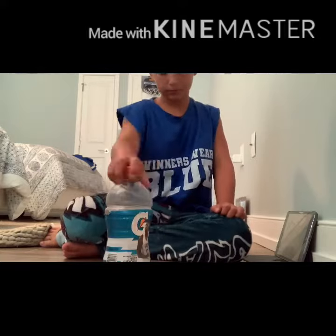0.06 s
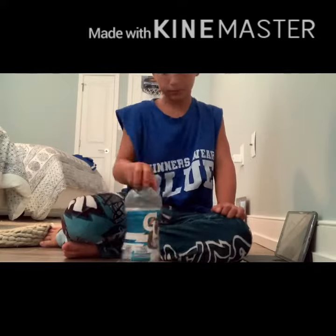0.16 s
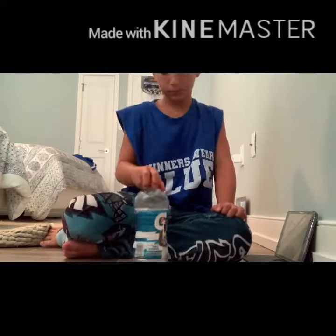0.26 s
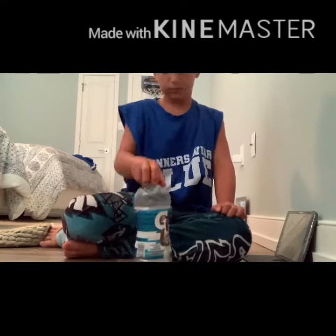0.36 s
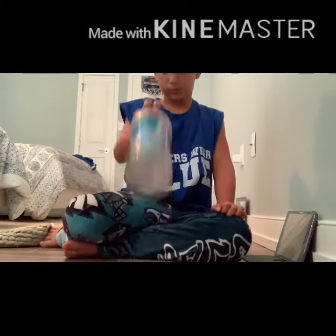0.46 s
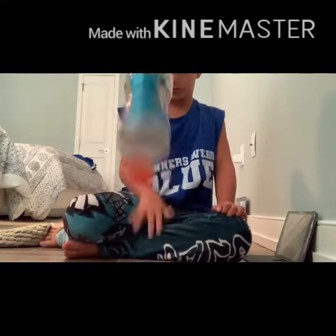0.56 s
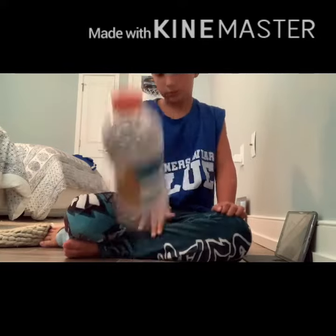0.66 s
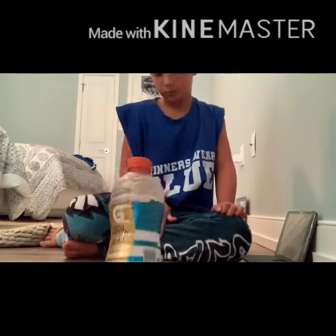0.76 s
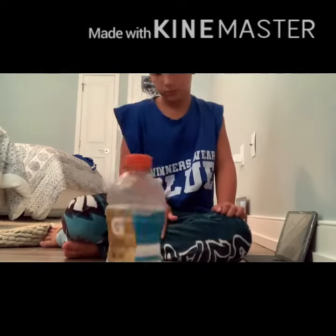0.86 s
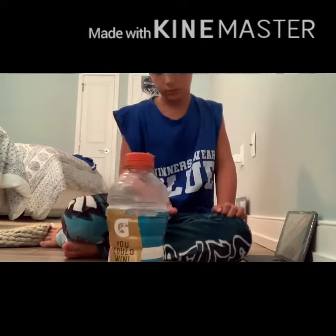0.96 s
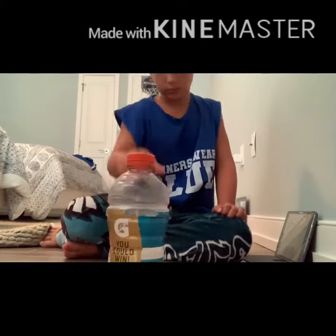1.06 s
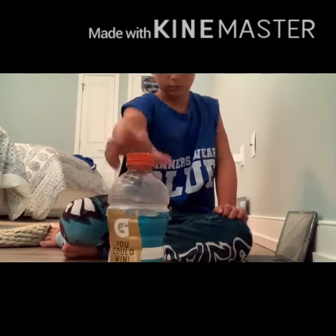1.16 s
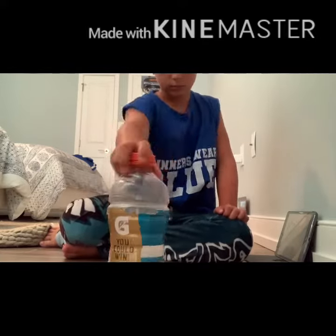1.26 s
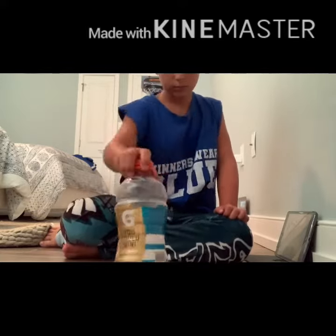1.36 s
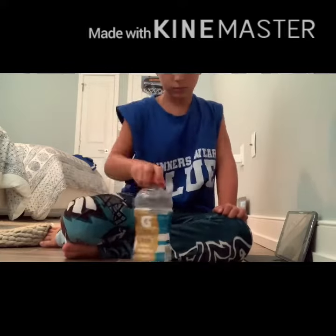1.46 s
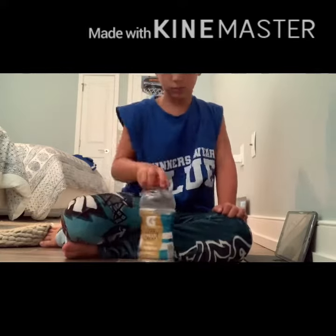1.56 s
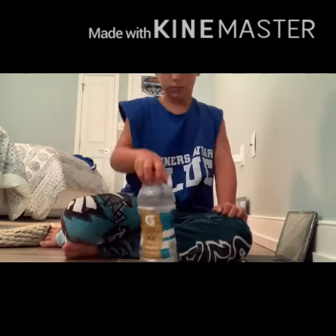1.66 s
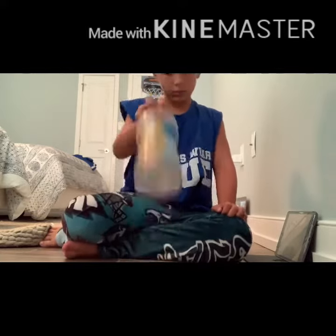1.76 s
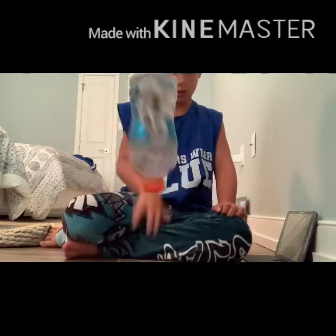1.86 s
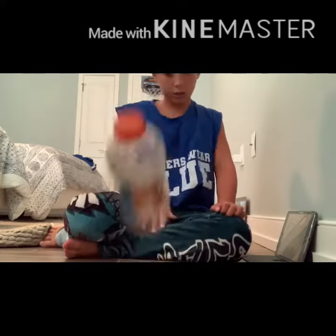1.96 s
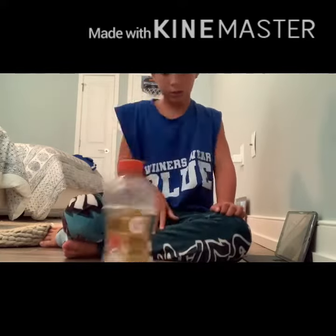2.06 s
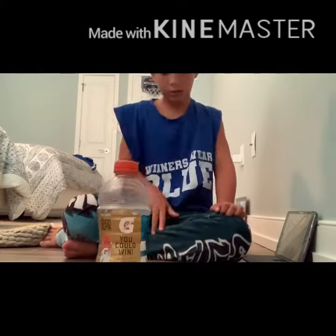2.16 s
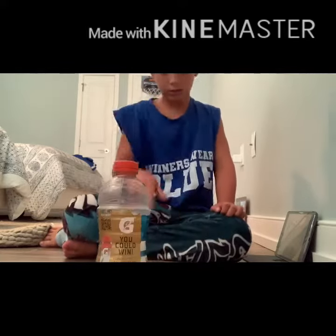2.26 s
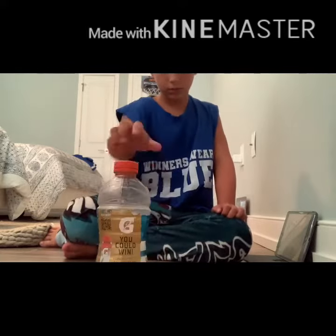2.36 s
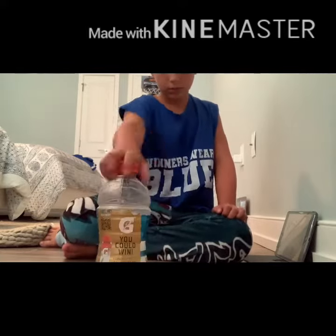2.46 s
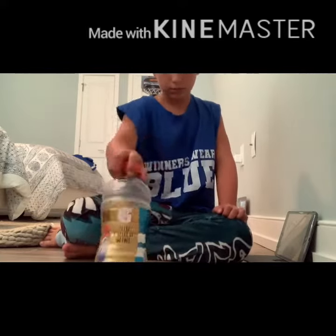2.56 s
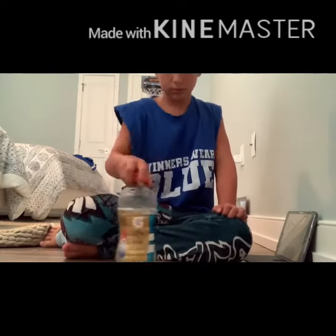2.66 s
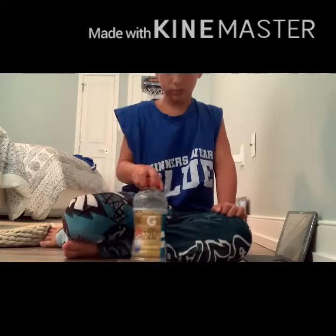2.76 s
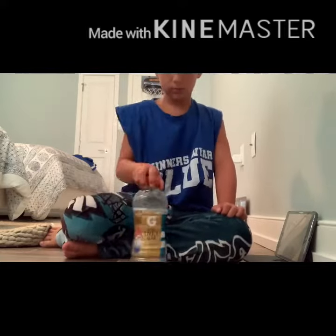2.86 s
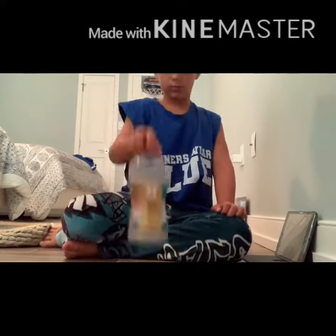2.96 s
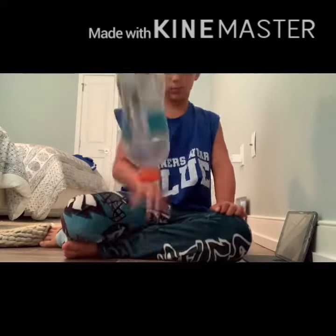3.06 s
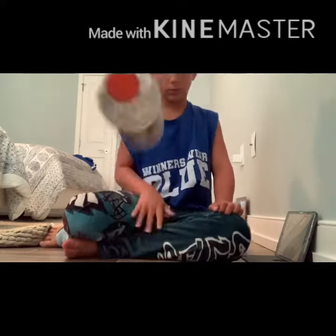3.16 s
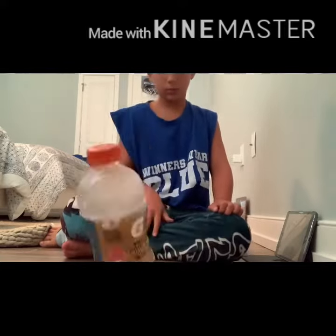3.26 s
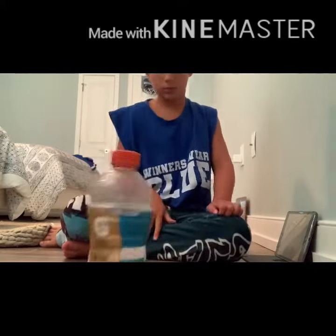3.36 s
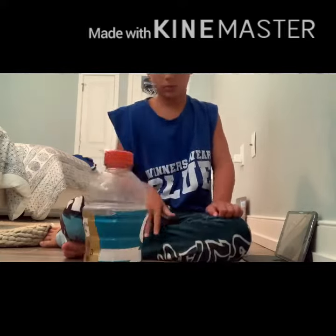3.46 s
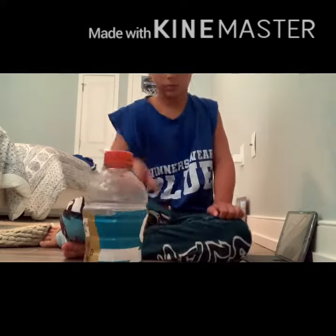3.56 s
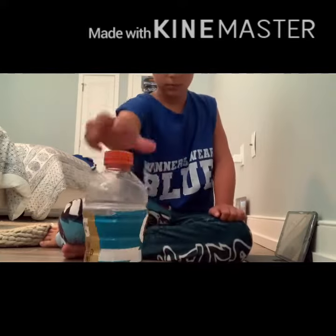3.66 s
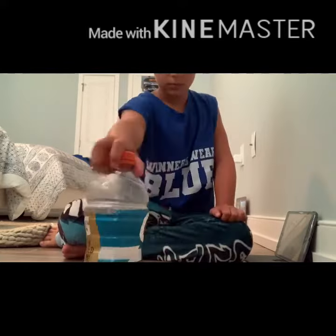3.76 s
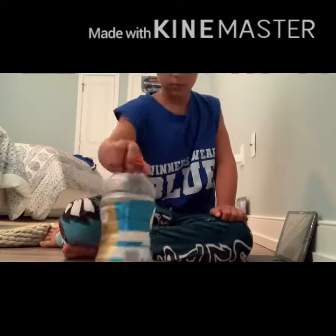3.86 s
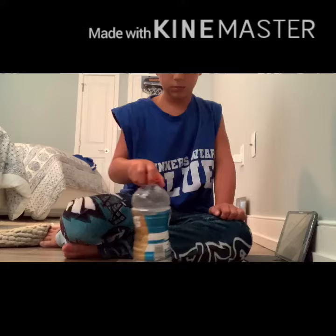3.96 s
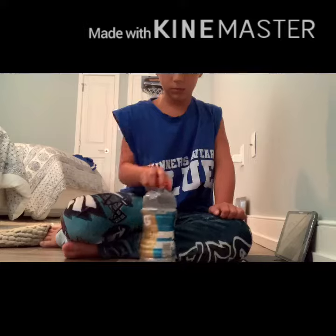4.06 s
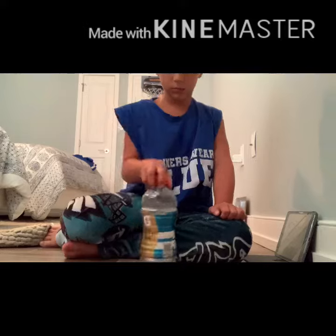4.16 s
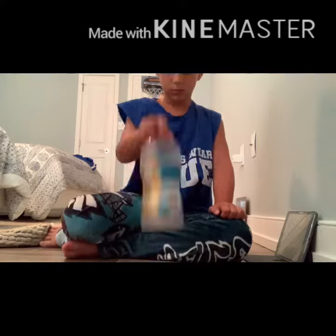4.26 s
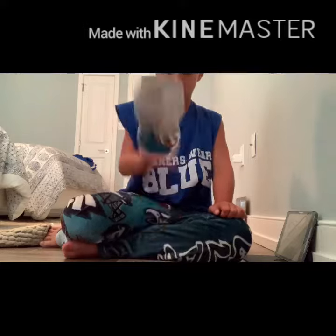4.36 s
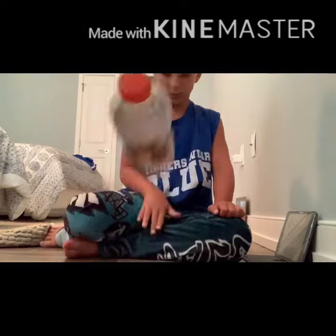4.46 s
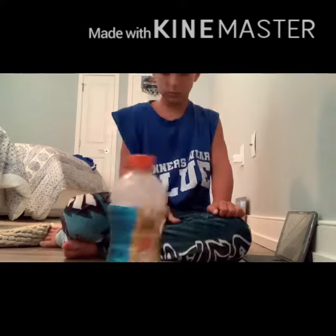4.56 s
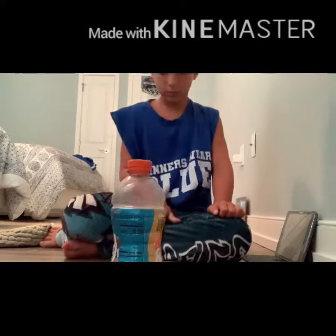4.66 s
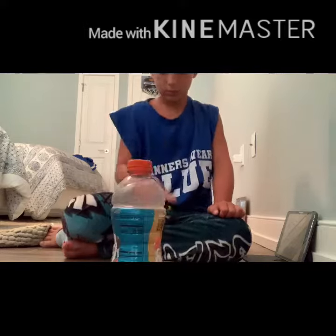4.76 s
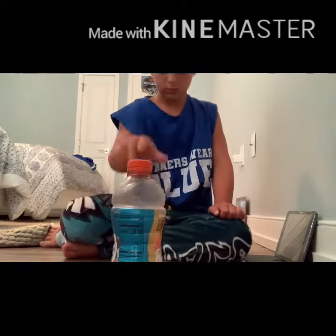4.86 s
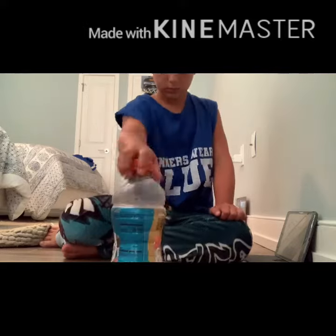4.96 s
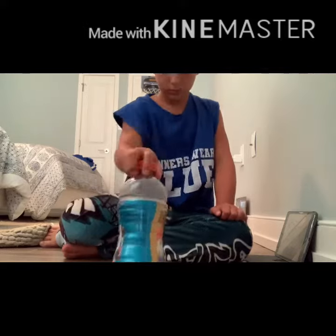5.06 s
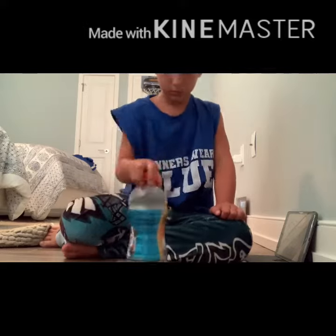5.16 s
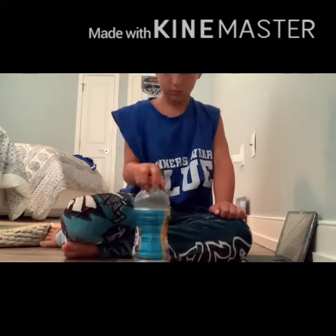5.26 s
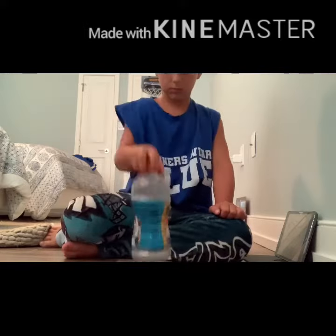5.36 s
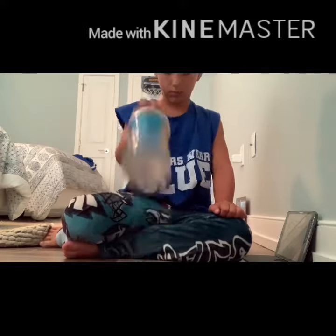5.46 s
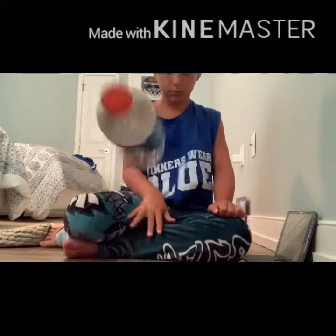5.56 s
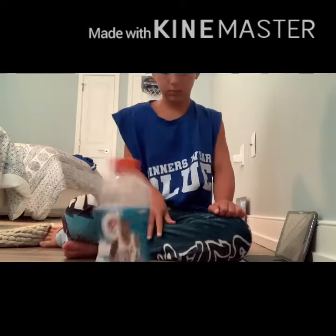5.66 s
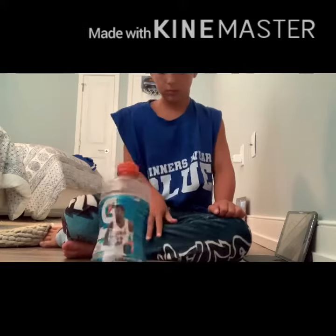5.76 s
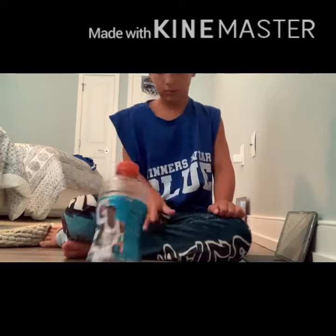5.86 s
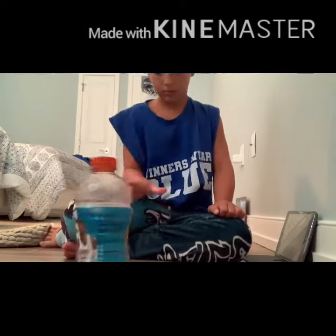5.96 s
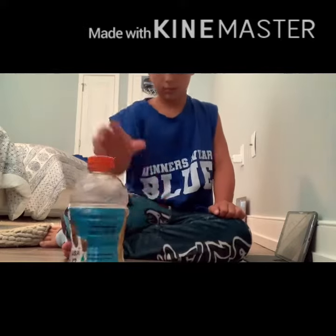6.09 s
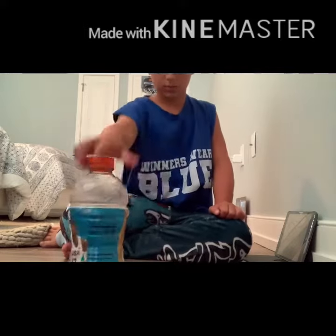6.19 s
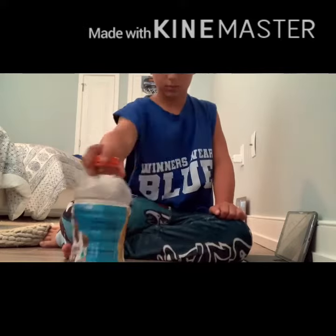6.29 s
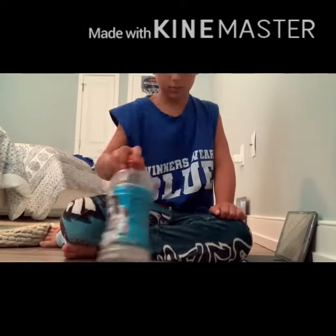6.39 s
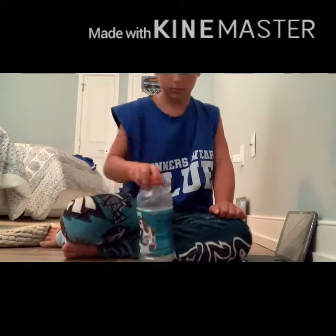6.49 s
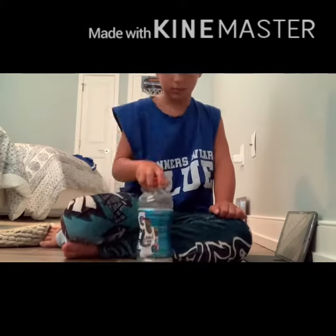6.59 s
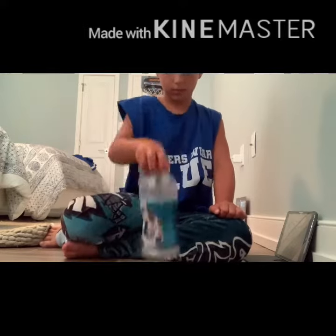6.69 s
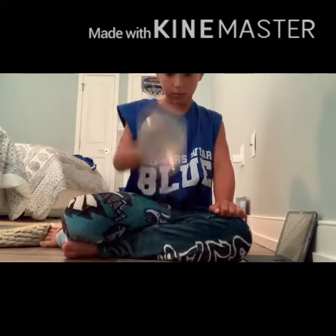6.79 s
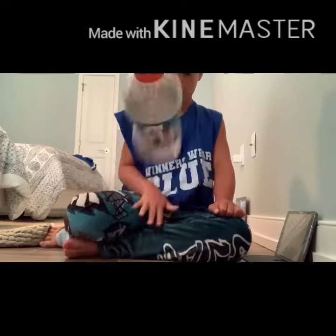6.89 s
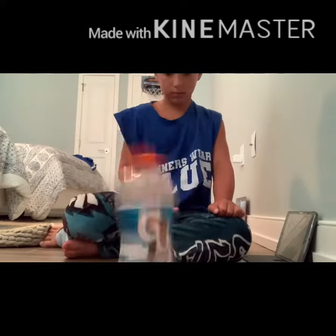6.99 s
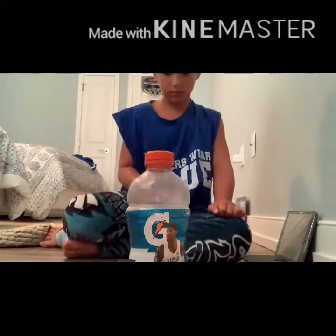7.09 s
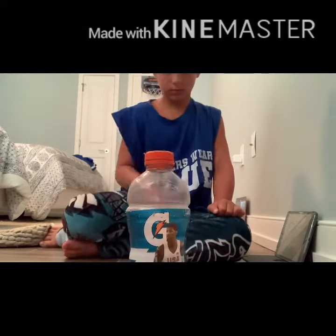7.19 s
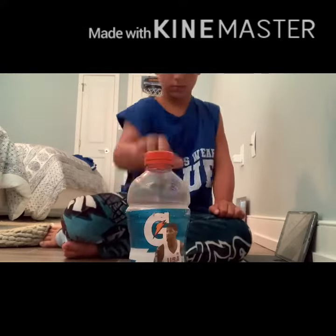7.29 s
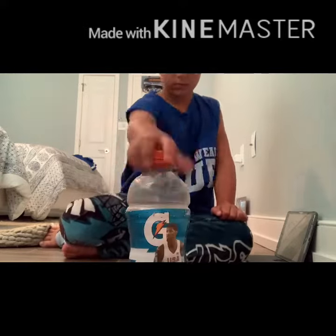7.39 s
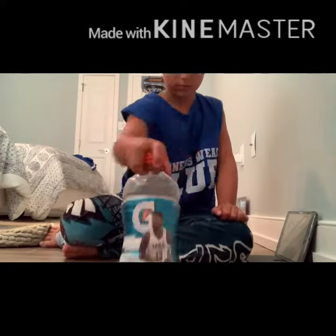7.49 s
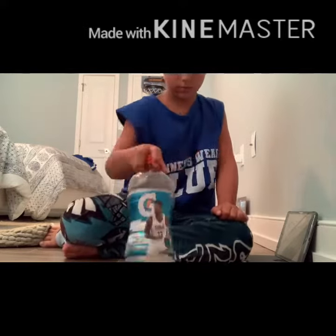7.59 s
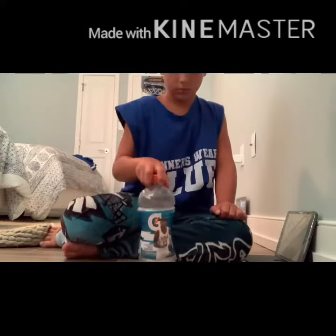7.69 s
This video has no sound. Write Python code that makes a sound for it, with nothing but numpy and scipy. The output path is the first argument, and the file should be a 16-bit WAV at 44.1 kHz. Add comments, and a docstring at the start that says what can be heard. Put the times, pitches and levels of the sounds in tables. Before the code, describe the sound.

Close recording in a small room with a faint low ventilation rush. A half-empty plastic bottle scrapes briefly over a hard floor, is flicked up with a hissing spray of water, and lands with a sharp hollow crack and thud, then rocks and gurgles. Light finger knocks follow. The cycle repeats six times, about every 1.3 seconds; the later throws lack the scrape.

```python
"""Over a steady low rush of ventilation, a partly filled plastic bottle is flipped six times onto a hard
floor in a small room, with drags over the floor before the first three throws. In swing and flight it hums
on gliding modes and the water sprays; landings are a noise crack, ringing modes and a falling floor sweep.
Coloured grains make the slosh and fizz as it rocks, and the hand's light knocks fall between throws.
Reflections and a diffuse tail form the room, heard close up through two microphone ports."""
import sys
import numpy as np
from scipy import signal
from scipy.fft import rfft, irfft, next_fast_len
from scipy.io import wavfile
from scipy.ndimage import uniform_filter1d, map_coordinates

SR = 44100
rng = np.random.default_rng(int(sys.argv[2]) if len(sys.argv) > 2 else 0)


def inscribe(sig):
    """Save sig as 16-bit PCM at rate SR to the path in sys.argv[1].

    A 1-D sig is mono; a 2-D sig holds one channel per row.
    Samples are clipped to [-1, 1] before scaling.
    """
    pcm = np.round(np.clip(np.atleast_2d(sig).T, -1, 1) * 32767)
    wavfile.write(sys.argv[1], SR, pcm.astype(np.int16))


N = 340893  # length of the scene in samples


def amp(db):
    """Decibels to gain."""
    return 10 ** (np.asarray(db) / 20)


def unit(x):
    """Scales to an rms of one."""
    return x / np.sqrt(np.mean(x ** 2) + 1e-20)


def read(points, hz):
    """Reads a table along a log-frequency axis."""
    f, value = np.transpose(points)
    return np.interp(np.log(hz + 1), np.log(f + 1), value)


def add(track, s, sound):
    """Mixes a sound in at time s."""
    part = track[max(round(s * SR), 0):][:len(sound)]
    part += sound[:len(part)]


def envelope(rows, attack_s, sag_db_per_s, release_db_per_s):
    """Gain over the whole scene for rows of (start s, length s, dB): attack, sagging hold, release."""
    t, gain = np.arange(SR // 2) / SR, np.zeros(N)
    for s, length, db in rows:
        fall = sag_db_per_s * t + release_db_per_s * np.maximum(t - length, 0)
        add(gain, s, np.minimum(t / attack_s, 1) * amp(db - fall))
    return gain


def colour(x, spectrum, size=2048):
    """Causal (minimum-phase) filter of unit energy with the given spectrum."""
    log_gain = np.log(amp(read(spectrum, abs(np.fft.fftfreq(size, 1 / SR)))))
    taps = np.fft.ifft(np.exp(np.conj(signal.hilbert(log_gain)))).real
    return signal.oaconvolve(x, taps / np.linalg.norm(taps))[:len(x)]


def grains(spectrum, per_s, spread_db=4):
    """A dense train of tiny impacts of uneven size, coloured, rms one."""
    size = amp(spread_db * np.minimum(rng.exponential(1, N), 3)) * rng.choice([-1, 1], N)
    struck = rng.random(N) < per_s / SR
    return unit(colour(size * struck, spectrum))


def smooth(x, bins, frames):
    """Moving average over the bins and frames of a spectrogram."""
    return uniform_filter1d(uniform_filter1d(x, size=bins, axis=0), size=frames, axis=1)


def patchy(x, depth_db):
    """Uneven contact: short patches of the spectrum flare and fade on their own."""
    _, _, z = signal.stft(x, SR, nperseg=512, noverlap=384)
    patches = smooth(rng.standard_normal(z.shape), bins=4, frames=6)
    z = z * amp(depth_db * unit(patches))
    return unit(signal.istft(z, SR, nperseg=512, noverlap=384)[1][:N])


# how alike diffuse sound is at the two ports: (f/Hz, likeness from 0 to 1)
PORT_LIKENESS = [(100, 1), (600, 0.98), (1500, 0.08), (2800, 0.24), (8000, 0.1), (15000, .35)]


def diffuse(pair):
    """Makes two unrelated signals alike in the bass, as close ports hear a diffuse field."""
    a, b = rfft(pair)
    same = np.clip(read(PORT_LIKENESS, np.fft.rfftfreq(pair.shape[1], 1 / SR)), -1, 1)
    return irfft([a, same * a + np.sqrt(1 - same ** 2) * b], pair.shape[1])


# spectrum of the ventilation's rush: (f/Hz, relative level/dB)
AIR_SPECTRUM = [(15, -43.5), (25, -33.5), (99, -7), (194, -4), (324, -17.5), (425, -8.5), (486, -21),
                (749, -16), (812, -29.5), (881, -22), (1040, -28.5), (1590, -29), (2150, -38.5),
                (5520, -38), (15800, -47)]
# partials of the motor: (f/Hz, mean level/dB)
MOTOR_HUM = [(111, -59.5), (220, -57), (333, -68.5)]


def background(rush_db=-55.0):
    """Low rush of ventilation with a motor hum wavering in level and phase."""
    noise = diffuse(rng.standard_normal((2, N)))
    rush = unit(np.array([colour(channel, AIR_SPECTRUM, size=8192) for channel in noise]))
    t, knots = np.arange(N) / SR, np.linspace(0, N / SR, 40)

    def waver():
        """A slow random drift."""
        return np.interp(t, knots, rng.standard_normal(len(knots)))

    hum = np.zeros(N)
    for hz, db in MOTOR_HUM:
        hum += amp(db + 1.5 * waver()) * np.sin(2 * np.pi * hz * t + 3.0 * waver())
    return amp(rush_db) * rush + hum


# base dragged over the floor: (start t/s, fastest t/s, end t/s, rumble level/dB, hiss level/dB before trim)
DRAGS = [(0.017, 0.093, 0.27, -40.5, -41.5), (1.216, 1.303, 1.59, -39, -39),
         (2.472, 2.54, 2.737, -38.5, -38.5)]
# spectrum of the coarse catches that shake the bottle: (f/Hz, relative level/dB)
RUMBLE_SPECTRUM = [(60, -14), (170, -7), (340, 4.5), (520, 5), (680, -11.5), (900, 2), (1380, 4.5),
                   (1750, -8), (2100, -3), (2600, -9.5), (3200, -52), (3900, -17), (9000, -50.5)]
# spectrum of fine friction, also lent to spray, fizz and rustles: (f/Hz, relative level/dB)
HISS_SPECTRUM = [(800, -19.5), (2200, -11), (3200, -7), (3900, -10.5), (5500, -4.5), (7000, -3.5),
                 (8200, -3.5), (9800, -3.5), (12500, -3), (14000, -12.5), (15800, -7)]
# the ribbed wall's buzz, raised by dragging and by landings: (f/Hz, relative level/dB)
WALL_SPECTRUM = [(1500, -26), (2500, -10.5), (2900, -1), (3300, -2), (3600, -4.5), (3950, -30), (8000, -45)]


def drag(near_s=0.00051, far_s=0.0021, rumble_power=1.45, hiss_power=3.8, mirror_gain=0.25):
    """The base speeds up and slows over the floor's grain: small catches shake the bottle, finer ones hiss."""
    shake, hiss, lag = np.zeros((3, N))
    for s, fastest_s, end_s, rumble_db, hiss_db in DRAGS:
        t = np.arange(s, end_s, 1 / SR)
        speed = np.sin(np.pi / 2 * np.interp(t, [s, fastest_s, end_s], [0, 1, 0]))
        add(shake, s, amp(rumble_db) * speed ** rumble_power)
        add(hiss, s, amp(hiss_db) * speed ** hiss_power)  # grows with speed much faster than the rumble
        add(lag, s, np.linspace(near_s, far_s, len(t)))
    scrape = shake * patchy(grains(RUMBLE_SPECTRUM, per_s=1500), depth_db=6.5)
    scrape += amp(-1.5) * hiss * patchy(grains(HISS_SPECTRUM, per_s=2000), depth_db=6.0)
    scrape += amp(-13) * np.sqrt(shake * hiss) * grains(WALL_SPECTRUM, per_s=1500)
    # a close reflection lags more as the bottle slides away, and sweeps the colour
    reflection = map_coordinates(scrape, [np.arange(N) - lag * SR], order=3)
    return scrape + mirror_gain * reflection


def floor_pulse(t, thud, knock, cycles=1.7, lead_s=0.000486):
    """Bending waves in the boards carry high pitches faster, so a blow arrives as a quick falling sweep."""
    hz = cycles / (t + lead_s)
    low, high = amp(thud), amp(knock)
    gain = read([(120, 0), (240, low), (400, low), (900, high), (1400, high), (3000, 0)], hz)
    return gain * np.sin(2 * np.pi * np.cumsum(hz) / SR)


# what bottle, floor and room ring with after a blow, before detuning: (f/Hz, relative level/dB, nominal t60/s)
BLOW_MODES = [(130.1, -6, 0.086), (187.4, -9, .1), (255, -4.5, 0.04), (285.1, -0.5, 0.11),
              (345.2, -4, 0.084), (412, -1.5, 0.031), (515.6, -9, 0.062), (579.3, 7, 0.016),
              (846, -12.5, 0.018), (858, 5, 0.02), (1086, -1, 0.022), (1170, 3, 0.023), (1402, -5, 0.02),
              (1483, -12.5, 0.043), (1740, -5.5, 0.0077), (3228, -24.5, 0.046)]
# spectrum of the thin wall's crackle: (f/Hz, relative level/dB)
CRACK_SPECTRUM = [(300, 9), (1200, -6.5), (2500, 4.5), (3300, -0.5), (4200, -1), (5500, 0), (7000, 3),
                  (8200, 1), (10000, 1), (13000, -1.5), (15800, -5.5)]


def blows(rows, crack_db, thud_db, knock_db, floor_db, crack_s, rise_cycles, loose, give_s=0.0012):
    """Each contact: the thin wall crackles, high modes knock, low modes thud, the floor flexes."""
    t, track = np.arange(SR // 4) / SR, np.zeros(N)
    hz, db, t60 = np.transpose(BLOW_MODES)[:, :, None]
    low = hz[:, 0] < 650  # Hz: thud modes below, knock modes above
    head = SR // 50  # levels are set over the first 20 ms
    detune = np.where(low, 0.025, 0.05)[:, None]
    for s, crack, thud, knock in rows:
        pitch = hz * (1 + detune * rng.standard_normal(hz.shape))  # each blow's modes are slightly detuned
        swell = (1 - np.exp(-t * hz / rise_cycles)) ** 2  # low modes take longer to get going
        decay = amp(db - 60 * t / (t60 * loose))  # a loose contact lets everything ring longer
        rings = decay * swell * np.sin(2 * np.pi * pitch * t)
        side = rng.choice([-1, 1], (len(hz), 1))  # the point of contact sets the sign of each shell mode
        heavy = rings[low].sum(0)
        stiff = (side * rings)[~low].sum(0)
        puff = t / crack_s * np.exp(-t / (crack_s * loose))
        burst = colour(rng.standard_normal(len(t)) * puff, CRACK_SPECTRUM)
        parts = [(burst, crack + crack_db, 0), (heavy, thud + thud_db, give_s), (stiff, knock + knock_db, give_s)]
        for part, level_db, lag_s in parts:
            add(track, s + lag_s, amp(level_db) * part / np.std(part[:head]))
        # a firm contact drives the floor harder
        add(track, s + give_s, amp(floor_db) / loose * floor_pulse(t, thud, knock + 5))
    return track


# fingers catching the bottle and setting it down, levels before trim:
# (t/s, crack level/dB, thud level/dB, knock level/dB)
HAND_CONTACTS = [(0.1802, -52, -35.5, -45.5), (1.1678, -46.5, -48.5, -49.5), (1.3554, -33.5, -38.5, -37.5),
                 (2.3681, -53, -86, -51), (2.3972, -40, -53, -50), (3.6762, -44, -40.5, -51.5),
                 (3.7085, -35, -44, -37.5), (3.9303, -31.5, -32, -32), (4.91, -50.5, -46.5, -57.5),
                 (5.1181, -27.5, -29.5, -30), (6.1725, -47.5, -50, -52.5), (6.234, -44.5, -49, -57),
                 (6.4461, -34, -28, -31.5), (6.4812, -39, -37.5, -52), (6.5098, -36, -39.5, -44),
                 (7.3506, -54.5, -46.5, -45), (7.455, -47, -52, -53.5), (7.6324, -33.5, -29, -34),
                 (7.6663, -43.5, -45.5, -51)]


def base_knocks(lag_s=0.001, rise_s=0.0022, hz=852, t60_s=0.0153, level_db=1.5):
    """Handled gently, the bottle answers mostly with one quickly damped mode of its stiff base."""
    t, track = np.arange(SR // 20) / SR, np.zeros(N)
    knock = amp(level_db - 60 * t / t60_s) * (1 - np.exp(-t / rise_s)) * np.sin(2 * np.pi * hz * t)
    for s, _, _, db in HAND_CONTACTS:
        add(track, s + lag_s, amp(db) * knock)
    return track


# the rim knocking on the floor as the bottle rocks, levels before trim:
# (t/s, crack level/dB, thud level/dB, knock level/dB)
RIM_ROCKS = [(0.637, -26, -29.5, -28.5), (0.7387, -34.5, -50, -47), (0.8406, -28.5, -20.5, -25),
             (0.862, -37, -22.5, -52), (0.8843, -33, -22.5, -29), (0.9, -42, -24.5, -33),
             (0.918, -39.5, -25, -34.5), (2.0364, -31, -22, -26.5), (2.0672, -41.5, -33.5, -31.5),
             (2.0854, -43.5, -34, -46.5), (3.2745, -46.5, -47.5, -32.5), (3.3069, -42, -26, -38),
             (3.3255, -37, -26.5, -42.5), (3.3789, -45.5, -32.5, -40.5), (3.4069, -49, -29.5, -39.5),
             (3.4325, -41, -28.5, -38), (3.4438, -58, -35.5, -38.5), (4.5875, -34, -23, -24),
             (4.6222, -60, -29.5, -49.5), (5.8726, -30.5, -19.5, -25), (5.904, -29, -26.5, -29),
             (5.9478, -39.5, -25, -44), (5.9742, -39, -33, -32)]


def light_blows():
    """The hand setting the bottle down, the fingers gripping and flicking it, and the rim rocking."""
    grips = [(s - swing_s, db, db, db) for s, swing_s, db, *_ in THROWS]
    flicks = [(s, db, db, db) for s, _, _, db, *_ in THROWS]
    track = blows(HAND_CONTACTS, crack_db=-14, thud_db=-6.5, knock_db=-8, floor_db=1,
                  crack_s=0.00147, rise_cycles=0.92, loose=0.94)
    track += base_knocks()
    track += blows(grips, crack_db=-11, thud_db=-7.5, knock_db=-18, floor_db=-13,
                   crack_s=0.0012, rise_cycles=1.0, loose=0.71)
    track += blows(flicks, crack_db=-12.5, thud_db=-5, knock_db=-13, floor_db=-9.5,
                   crack_s=0.0014, rise_cycles=1.0, loose=0.8)
    track += blows(RIM_ROCKS, crack_db=-10, thud_db=-7.0, knock_db=-5.5, floor_db=0.0,
                   crack_s=0.0026, rise_cycles=0.87, loose=0.85)
    return track


# fingers and clothes rustling between throws: (start t/s, length t/s, level/dB)
RUSTLES = [(0.25, 0.074, -60.5), (1.64, 0.28, -66.5), (4.9, 0.08, -66), (6.61, 0.035, -60.5),
           (7.17, 0.065, -65), (7.36, 0.077, -63.5), (7.545, 0.017, -64)]


def rustle():
    """Fingers and clothes rub: a fine hiss of grains under short envelopes."""
    gain = envelope(RUSTLES, attack_s=0.0067, sag_db_per_s=21, release_db_per_s=299)
    return gain * grains(HISS_SPECTRUM, per_s=1500)


def glide(hz, gain, edge_s=0.0068, flutter_db=7.0):
    """A tone on a moving pitch, fluttering at random in level, with soft ends."""
    t = np.arange(len(hz)) / SR
    knots = np.linspace(0, t[-1], num=12)
    flutter = amp(flutter_db * np.interp(t, knots, rng.standard_normal(size=12)))
    ends = np.minimum(np.minimum(t, t[-1] - t) / edge_s, 1)
    return gain * flutter * ends * np.sin(2 * np.pi * np.cumsum(hz) / SR)


# the six throws, tick, flick and tones before trim and flutter: (release t/s, swing length t/s,
# grip tick level/dB, flick level/dB, mid-swing f/Hz, swing level/dB, ring level/dB,
# upper mode f/Hz, flight f/Hz, flight level/dB, spray level/dB)
THROWS = [(0.5053, 0.051, -46.5, -36, 312.7, -43.5, -41, 500, 333, -46, -38),
          (1.8123, 0.043, -55.5, -34, 342.4, -45, -46, 464, 277, -46.5, -41.5),
          (3.055, 0.048, -43.5, -33.5, 368, -48, -46, 449, 289, -40.5, -42),
          (4.3357, 0.047, -51.5, -39.5, 312.7, -45, -41.5, 502, 276.6, -43, -41),
          (5.4887, 0.045, -44.5, -32, 331, -45, -42.5, 499, 268, -46, -41.5),
          (6.8008, 0.037, -58, -40.5, 335, -46, -36.5, 437, 239, -47, -37.5)]


def bottle_tones(spread_s=0.069, spread_width_s=0.0054, swing_rise_hz_per_s=1100, release_hz=217.6):
    """The lowest mode rises in the swing, drops and rings at release, climbs as water spreads along the wall."""
    ring_fade_db_per_s, upper_fade_db_per_s = 280.5, 193
    upper_db = -2.5  # upper mode relative to the lowest
    track = np.zeros(N)
    for throw, (landing_s, *_) in zip(THROWS, LANDINGS):
        s, swing_s, _, _, swing_hz, swing_db, ring_db, upper_hz, flight_hz, flight_db, _ = throw
        t = np.arange(-swing_s, 0.012, 1 / SR)
        swing_pitch = swing_hz + swing_rise_hz_per_s * (t - t.mean())
        add(track, s - swing_s, glide(swing_pitch, amp(swing_db)))
        t = np.arange(0, landing_s - s, 1 / SR)
        spread = 1 / (1 + np.exp((spread_s - t) / spread_width_s))  # 0 gathered, 1 spread along the wall
        gain = amp(ring_db - ring_fade_db_per_s * t) * (1 - spread) + amp(flight_db) * spread
        add(track, s, glide(release_hz + (flight_hz - release_hz) * spread, gain))
        upper_gain = amp(ring_db + upper_db - upper_fade_db_per_s * t)
        add(track, s, glide(np.full(len(t), upper_hz), upper_gain))
    return track


# single bubbles in the water, in flight or at rest, levels before trim: (t/s, level/dB, starting f/Hz)
BUBBLES = [(3.091, -40, 1050), (4.972, -43.5, 940), (5.7423, -42, 1590), (5.8034, -36.5, 1540),
           (6.258, -45, 975), (7.1056, -34, 1320)]


def bubbles(level_db=1, rise_per_s=0.4, rough=0.93):
    """Each bubble rings briefly and unevenly against the wall, rising in pitch."""
    t, track = np.arange(SR // 16) / SR, np.zeros(N)
    ring = np.exp(-t / 0.005) * (1 - np.exp(-t / 0.001))
    for s, db, hz in BUBBLES:
        angle = 2 * np.pi * np.cumsum(hz * (1 + rise_per_s * t)) / SR
        wobble = 1 + rough * unit(uniform_filter1d(rng.standard_normal(len(t)), size=40))
        add(track, s, amp(db + level_db) * ring * wobble * np.sin(angle))
    return track


# how long the spray takes to build up in each throw: t/s
SPRAY_RISES = [0.027, 0.0077, 0.006, 0.02, 0.008, 0.04]
# spells in which the bottle rocks on its rim and stirs the water, levels before trim:
# (start t/s, length t/s, gurgle level/dB, fizz level/dB)
ROCKING = [(0.856, 0.088, -22.5, -59), (2.05, 0.05, -27, -58), (3.274, 0.16, -28.5, -43.5),
           (4.587, 0.042, -23.5, -47), (5.86, 0.152, -21, -46)]
# spectrum of the sloshing water: (f/Hz, relative level/dB)
GURGLE_SPECTRUM = [(70, -34.5), (160, -8.5), (330, 17.5), (450, 12.5), (660, -22.5), (950, 7.5), (1150, 8),
                   (1500, -19), (2000, -7), (4000, -34.5), (9000, -47)]


def water(spray_s=0.045, swing_spray_db=-19, slosh_s=0.13, slosh_db=-30.5, splash_db=-45.5):
    """Fine spray in swing and flight; gurgle and fizz after landings and while rocking; single bubbles."""
    swings = [(s - swing_s, swing_s, db + swing_spray_db) for s, swing_s, *_, db in THROWS]
    spray = envelope(swings, attack_s=0.01, sag_db_per_s=57, release_db_per_s=403.5)
    for (s, *_, db), rise_s in zip(THROWS, SPRAY_RISES):
        spray += envelope([(s, spray_s, db)], rise_s, sag_db_per_s=42.5, release_db_per_s=377.5)

    # after every landing the water falls back
    sloshes = [(s, slosh_s, slosh_db) for s, *_ in LANDINGS]
    stirs = [(s, length, db) for s, length, db, _ in ROCKING]
    gurgle = envelope(sloshes, attack_s=0.03, sag_db_per_s=34, release_db_per_s=262.5)
    gurgle += envelope(stirs, attack_s=0.03, sag_db_per_s=41.5, release_db_per_s=476)

    splashes = [(s, slosh_s, splash_db) for s, *_ in LANDINGS]
    stirred_fizz = [(s, length, db) for s, length, _, db in ROCKING]
    fizz = envelope(splashes, attack_s=0.013, sag_db_per_s=21, release_db_per_s=131)
    fizz += envelope(stirred_fizz, attack_s=0.006, sag_db_per_s=79, release_db_per_s=300)

    liquid = spray * patchy(grains(HISS_SPECTRUM, per_s=3000), depth_db=6.0)
    liquid += amp(-8) * gurgle * grains(GURGLE_SPECTRUM, per_s=1500)
    liquid += amp(-10.5) * fizz * grains(HISS_SPECTRUM, per_s=620)
    return liquid + bubbles()


# the six landings, rim first, then the base slaps flat, levels before trim:
# (t/s, crack level/dB, thud level/dB, knock level/dB, slap delay t/s, slap level/dB)
LANDINGS = [(0.627, -30.5, -20.5, -21.5, 0.022, -25), (1.922, -32.5, -22, -26.5, 0.011, -27),
            (3.1775, -32.5, -22, -25.5, 0.012, -25.5), (4.4625, -31, -20, -25, 0.012, -30),
            (5.6012, -30.5, -20.5, -23.5, 0.014, -24), (6.9421, -30, -19, -29.5, 0.012, -21)]


def landing_blows():
    """The rim hits the floor, and a moment later the base slaps flat."""
    rims = [row[:4] for row in LANDINGS]
    slaps = [(s + delay, db, db, db) for s, *_, delay, db in LANDINGS]
    track = blows(rims, crack_db=3.0, thud_db=1.0, knock_db=-1.5, floor_db=4,
                  crack_s=0.0019, rise_cycles=3.0, loose=0.71)
    track += blows(slaps, crack_db=-28.5, thud_db=-8, knock_db=-11.5, floor_db=1,
                   crack_s=0.0066, rise_cycles=3.1, loose=0.8)
    return track


def wall_buzz():
    """The thin wall keeps buzzing for a moment after each landing."""
    rows = [(s, 0.035, knock) for s, _, _, knock, *_ in LANDINGS]
    shake = envelope(rows, attack_s=0.008, sag_db_per_s=73.5, release_db_per_s=260.5)
    return amp(-22.0) * shake * grains(WALL_SPECTRUM, per_s=1500)


# treble scattered off the floor close by: (f/Hz, relative level/dB)
SCATTER_SPECTRUM = [(300, -46), (1200, -24), (2200, 12.5), (3200, -9.5), (4500, 6), (15000, 3)]


def scatter(x, level_db=-8, decay_s=0.00047):
    """Treble scatters off the floor close by and reaches each port differently."""
    t = np.arange(SR // 100) / SR
    noise = rng.standard_normal((2, len(t))) * np.exp(-t / decay_s)
    taps = np.array([colour(channel, SCATTER_SPECTRUM) for channel in noise])
    taps *= amp(level_db) / np.linalg.norm(taps, axis=1, keepdims=True)
    return signal.oaconvolve(x[None], taps, axes=1)[:, :N]


# decay time of the room's tail: (f/Hz, t60/s)
ROOM_T60 = [(120, 0.22), (300, 0.1), (1000, 0.19), (3000, 0.23), (8000, 0.28), (15000, 0.27)]
# colour of the tail: (f/Hz, relative level/dB)
ROOM_COLOUR = [(100, -3.5), (300, -9.5), (600, 3.5), (1200, -4), (3200, 1), (8000, -0.5), (15000, -0.5)]
# reflections off walls and ceiling: (delay t/s, relative gain)
ECHOES = [(0.0085, 0.35), (0.0128, 0.27), (0.017, .35), (0.0263, 0.16)]


def room(x, first_s=0.0019, build_s=0.0045):
    """A few hard reflections over a diffuse tail that decays at its own rate in each band."""
    t = np.arange(SR * 3 // 4) / SR
    noise = diffuse(rng.standard_normal((2, len(t))))
    hz, frame_s, z = signal.stft(noise, SR, nperseg=256)
    t60 = read(ROOM_T60, hz)[:, None]
    even_energy = np.sqrt(2 * np.log(1000) / (t60 * SR))  # evens out energy between long and short decays
    z = z * amp(read(ROOM_COLOUR, hz)[:, None] - 60 * frame_s / t60) * even_energy
    tail = signal.istft(z, SR, nperseg=256)[1][:, :len(t)]
    tail *= amp(2.5) * (1 - np.exp(-np.maximum(t - first_s, 0) / build_s))
    for delay_s, gain in ECHOES:
        for channel in tail:
            add(channel, delay_s, gain * unit(np.hanning(9)) / 7)
    return signal.fftconvolve(x[None], tail, axes=1)[:, :N]


def scene():
    """The bottle, its room and the background; landings shake the whole floor and feed the room most."""
    landings = landing_blows() + wall_buzz()
    taps, tones, liquid = light_blows(), bottle_tones(), water()
    rubbing = drag() + rustle()
    direct = landings + taps + tones + liquid + rubbing
    sent = landings + amp(-3) * taps + amp(-4.0) * tones + amp(-9.5) * liquid + amp(-3.5) * rubbing
    return direct + scatter(direct) + room(sent) + background()


def suppress(pair, threshold_db=-85, depth_db=-11, from_hz=1700):
    """Noise suppressor: turns treble down wherever it sinks under a threshold, which shortens the tails."""
    hz, _, z = signal.stft(pair, SR, nperseg=512, noverlap=384)
    power = smooth((abs(z) ** 2).mean(0), bins=9, frames=3)
    shut = 1 / (1 + (power / amp(threshold_db) ** 2) ** 2)
    treble = np.clip(hz / from_hz - 1, 0, 1)[:, None]
    return signal.istft(z * amp(depth_db * shut * treble), SR, nperseg=512, noverlap=384)[1][:, :N]


# phase between the two microphone ports: (f/Hz, lead of the left/radians)
PORT_PHASE = [(20, 0), (500, -.7), (780, -.9), (1300, -3.1), (1720, -5), (2220, -3.1), (3100, -2.6),
              (3500, -.4), (4300, 2.3), (5050, 3.1), (6000, 6.3), (7000, 7.1), (8250, 9.6), (9700, 12.9),
              (10900, 15.9), (12050, 21), (13400, 25.2), (15500, 31.3)]
# balance between the ports: (f/Hz, left minus right level/dB)
PORT_BALANCE = [(250, 0), (520, -2.5), (830, 4), (1040, -4), (1520, 10.5), (2030, -5.5), (2520, 6.5),
                (3350, -2.5), (5100, -2.5), (7000, 2.5), (8200, -0.5), (15000, 1)]
# colour shared by both ports: (f/Hz, level/dB)
MIC_COLOUR = [(80, -1), (130, -2.5), (200, 0), (520, 1), (700, -6), (900, 1.5), (1500, 1), (2100, 1),
              (2700, 2), (3150, 3), (3900, 2), (6000, 0.5), (10000, 1)]


def record(dry, ceiling_db=-5.5, edge_hz=15850):
    """Two ports with their own phase and colour, noise suppression, soft overload, and the band limit."""
    size = next_fast_len(N + SR // 10)
    hz = np.fft.rfftfreq(size, 1 / SR)
    half = amp(read(PORT_BALANCE, hz) / 2) * np.exp(0.5j * read(PORT_PHASE, hz))  # split evenly left and right
    spectrum = rfft(dry, size) * amp(read(MIC_COLOUR, hz))
    ports = irfft(spectrum * np.array([half, 1 / half]), size)[:, :N]
    ceiling = amp(ceiling_db)
    held = ceiling * np.tanh(suppress(ports) / ceiling)
    lowpass = signal.firwin(301, edge_hz, window=("kaiser", 7), fs=SR)
    return signal.oaconvolve(held, lowpass[None], "same")


dry = scene()
out = record(dry)
inscribe(out)
```